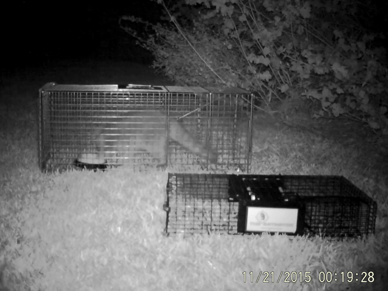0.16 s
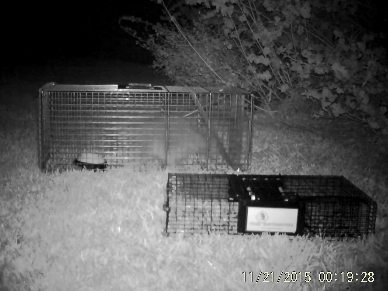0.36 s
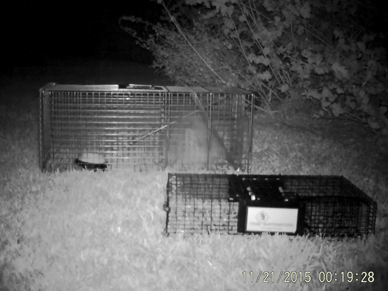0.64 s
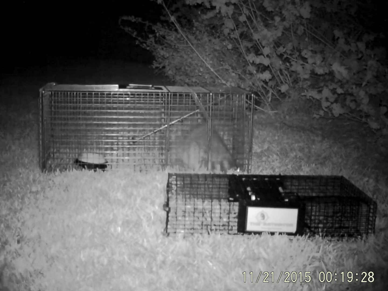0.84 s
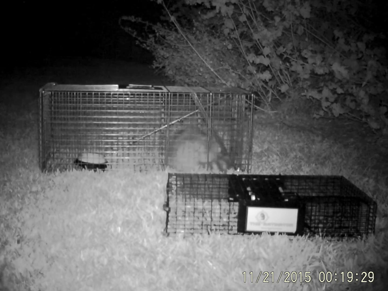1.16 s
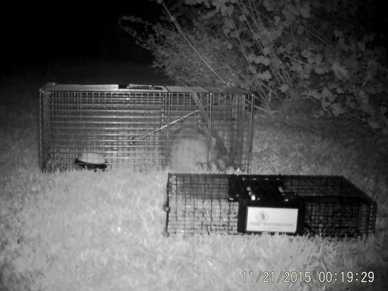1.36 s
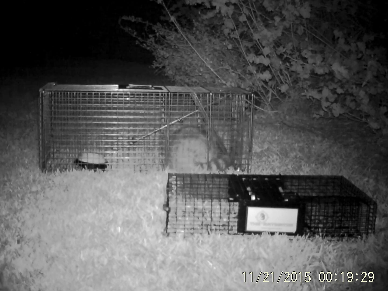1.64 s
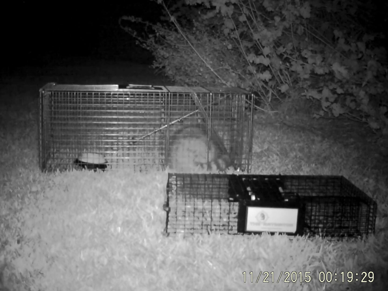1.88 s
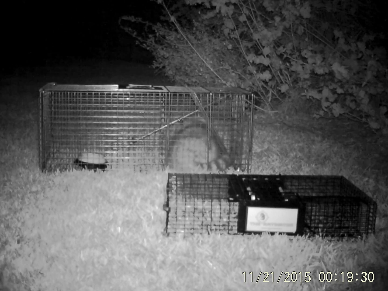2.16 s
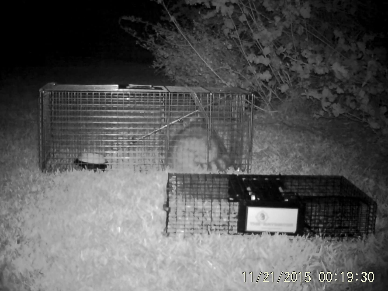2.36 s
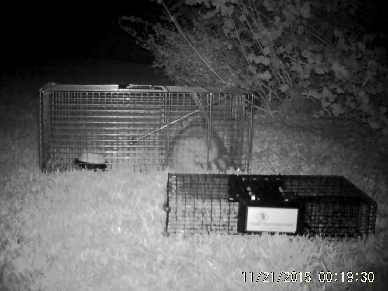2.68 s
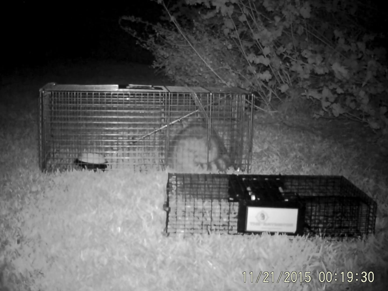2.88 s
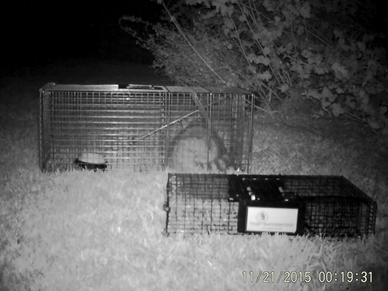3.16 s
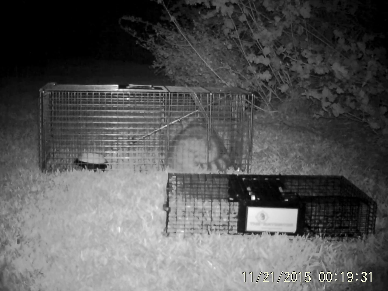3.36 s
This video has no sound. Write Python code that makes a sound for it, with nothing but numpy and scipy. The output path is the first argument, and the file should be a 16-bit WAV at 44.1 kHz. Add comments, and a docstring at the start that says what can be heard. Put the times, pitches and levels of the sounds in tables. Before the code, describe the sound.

Ringing wire mesh rattles with dull thumps, followed by dry metal clacks fading to ticks.

```python
"""Ringing rattles of wire mesh, with dull thumps: a raccoon lunges and turns in a cage trap at night.
Each shake sets the wires chattering against each other; its body thumps the cage floor.
It paws at the door: dry clacks on damped metal, one squeak of a claw along a wire, a few last ticks.
Steady hiss and a faint hum lie underneath."""
import sys
import numpy as np
from scipy import signal
from scipy.fft import rfft, irfft
from scipy.io import wavfile

SR = 44100
rng = np.random.default_rng(int(sys.argv[2]) if len(sys.argv) > 2 else 0)


def to_wav(sig):
    """Store sig (one row per channel, or 1-D mono) as 16-bit WAV at the path in sys.argv[1].

    Samples outside -1..1 are clipped; the rate is SR.
    """
    pcm = np.clip(np.atleast_2d(sig), -1, 1) * 32767
    pcm = np.round(pcm).astype(np.int16)
    wavfile.write(sys.argv[1], SR, pcm.T)  # frames by channels


N = 155232
HZ = np.maximum(np.fft.rfftfreq(N, 1 / SR), 1)
RING_S = np.arange(int(.7 * SR)) / SR
BASS_BELOW_HZ, LOWS_BELOW_HZ, TREBLE_ABOVE_HZ = 780, 2780, 7200

# long-ringing wires: (frequency [Hz], relative level [dB])
WIRE_RINGS = [(807, -2), (1093, -4.5), (1334, -0.5), (1394, 0.5), (1760, -8.5), (2245, -2.5), (3160, -6),
              (3595, -7), (4156, 7), (4320, 3.5), (4460, 8), (4574, 0.5), (5340, -7), (5910, 2.5)]
# dense weaker mesh modes: (frequency [Hz], relative density [dB])
MESH_SPECTRUM = [(250, -19.5), (480, -20), (700, -15.5), (950, -12), (1350, -13.5), (1900, -13),
                 (2300, -9.5), (2700, -18), (3200, -7.5), (3700, -10.5), (4400, 0), (5000, -5.5),
                 (6300, -9), (7200, -15.5), (8800, -22.5), (11300, -16.5), (12700, -24), (14800, -21)]
# mesh shakes: (time [s], level [dB], chatter length [s], lows [dB], treble [dB])
SHAKES = [(0.003, -46, 0.023, 5.5, 2), (0.094, -49.5, 0.0044, 0, 6), (0.142, -47.5, 0.013, -2, 3),
          (0.1712, -39, 0.0051, -2, 3.5), (0.203, -31, 0.011, -3, 5.5), (0.2135, -30, 0.016, 2, 0.5),
          (0.241, -38.5, 0.016, 3.5, 10), (0.286, -40, 0.088, 3, 0), (0.3827, -43.5, 0.0058, 1, -6),
          (0.4086, -35.5, 0.028, 1, 6.5), (0.447, -36.5, 0.043, 2.5, 1), (0.494, -38.5, 0.011, 1.5, 3),
          (0.525, -58, 0.03, 16, 13), (0.605, -54.5, 0.008, 12, 1), (0.6743, -47, 0.0042, 9, 6),
          (0.684, -43, 0.025, 5.5, 5), (0.735, -41.5, 0.029, -7, 3), (0.797, -49.5, 0.031, 8.5, 5.5),
          (0.872, -45.5, 0.02, 6, 1)]


def mesh_rattles(mesh_t60_s=0.53, wire_t60_s=0.32, wires_db=-6, clash_db=3.5, clash_t60_s=0.032):
    """Shaken wires strike each other: each contact crashes briefly, then mesh and wires ring."""
    out = np.zeros(N)
    wire_hz, wire_db = np.transpose(WIRE_RINGS)
    wires = modes(wire_hz, wire_t60_s)
    mesh_gain = rms_one(at_hz(MESH_SPECTRUM, HZ))
    mesh_decay = np.hypot(decay(mesh_t60_s), from_db(clash_db) * decay(clash_t60_s))
    for s, db, length_s, lows_db, treble_db in SHAKES:
        tilt_db = lows_db * lows(HZ, LOWS_BELOW_HZ) + treble_db * (1 - lows(HZ, TREBLE_ABOVE_HZ))
        mesh = noise(mesh_gain * from_db(tilt_db))[:len(RING_S)] * mesh_decay
        strength = from_db(wire_db + wires_db + lows_db * lows(wire_hz, LOWS_BELOW_HZ))
        strength /= np.linalg.norm(from_db(wire_db))
        ring = mesh / np.sqrt(2) + (strength * rng.choice([-1, 1], len(wire_hz))) @ wires
        add(out, s, from_db(db) * signal.fftconvolve(chatter(length_s), ring))
    return out


# damped door modes: (frequency [Hz], relative level [dB], T60 [s])
DOOR_RINGS = [(650, -2, 0.012), (1100, -6.5, 0.0094), (1770, -4.5, 0.013), (2380, -0.5, 0.013),
              (3090, -5, .017), (3900, -2, 0.012), (4620, 1, 0.011), (5380, -0.5, .019), (5800, 1, 0.01),
              (6430, 4, 0.0063)]
# claw and door knocks: (time [s], level [dB], chatter length [s], lows [dB], bass [dB])
KNOCKS = [(0.39, -30, .006, 3, 0), (0.4994, -37, .004, 16, -5), (0.785, -29.5, .003, -6, 16),
          (0.8268, -33, .007, -13, 14), (0.869, -44, .0025, -12, -6), (0.893, -45, .007, -14, -1),
          (0.937, -29, .004, -3.5, -1), (0.9565, -37.5, .004, 8, -5), (0.968, -35, .02, 2.5, 6),
          (1.0047, -40.5, .015, 12, -14), (1.072, -42, .0025, 7, -11), (1.0766, -42, .004, 5, 3),
          (1.1185, -36, .0035, 10, 2), (1.151, -50, .012, 14, 0), (1.172, -42.5, .018, 1, -4),
          (1.2224, -47, .003, -7, -4), (1.4092, -42.5, .0025, -15, 0)]


def door_clacks(spread_db=1.5, crack_db=-12.5, tail_db=-16.5, tail_t60_s=0.17, top_hz=6300):
    """Each knock is a few quick contacts on damped metal, with a noisy crack and a faint tail."""
    out = np.zeros(N)
    hz, mode_db, t60_s = np.transpose(DOOR_RINGS)
    door = modes(hz, t60_s)
    band = signal.butter(4, [hz.min(), top_hz], "band", fs=SR, output="sos")
    grit_decay = from_db(crack_db) * decay(t60_s.min()) + from_db(tail_db) * decay(tail_t60_s)
    for s, db, length_s, lows_db, bass_db in KNOCKS:
        tilt_db = lows_db * lows(hz, LOWS_BELOW_HZ) + bass_db * lows(hz, BASS_BELOW_HZ)
        strength = from_db(mode_db + tilt_db + spread_db * rng.standard_normal(len(hz)))
        ring = (strength * rng.choice([-1, 1], len(hz))) @ door / np.linalg.norm(from_db(mode_db))
        grit = rms_one(signal.sosfilt(band, rng.standard_normal(len(RING_S))))
        knock = signal.fftconvolve(chatter(length_s), ring + grit * grit_decay)
        knock *= np.sqrt(0.0017 * SR) / np.linalg.norm(knock)   # energy of 1.7 ms at rms 1
        add(out, s, from_db(db) * knock)
    return out


# claw drag: (time [s], level [dB], length [s], pitch [Hz])
CLAW_DRAGS = [(0.962, -43, .027, 1750)]


def claw_squeak():
    """A claw drags along a wire: a short, rough tone."""
    return swells(CLAW_DRAGS, width_hz=190)


# body landings: (time [s], level [dB], length [s], pitch [Hz])
LANDINGS = [(0.388, -44, 0.027, 185), (0.412, -48.5, 0.048, 158), (0.462, -57.5, 0.067, 119),
            (0.764, -47.5, 0.025, 113), (0.788, -54, 0.022, 256), (0.802, -49.5, 0.04, 138)]


def floor_thumps():
    """The body lands on the cage floor: low, dull pulses."""
    return swells(LANDINGS, width_hz=110)


# hiss: (frequency [Hz], density [dB re 1/Hz])
HISS_SPECTRUM = [(20, -82), (45, -87.5), (80, -82), (130, -84.5), (250, -90), (500, -92.5), (850, -94),
                 (2000, -98), (5000, -102.1), (10000, -103.1), (15500, -103.1)]
# hum: (frequency [Hz], level [dB])
HUM_TONES = [(61, -68), (113, -70)]


def background():
    """Even hiss and a faint hum of narrow, wavering noise bands."""
    hiss = noise(at_hz(HISS_SPECTRUM, HZ) * np.sqrt(SR / 2))
    hum = sum(from_db(db) * resonant_noise(hz, width_hz=5) for hz, db in HUM_TONES)
    return hiss + hum


def chatter(length_s, contacts_per_s=950, spread_db=4, first_db=6):
    """A first contact and an uneven run of mostly smaller ones; energy 1."""
    times_s = np.cumsum(rng.exponential(1, 200)) / contacts_per_s
    sizes = from_db(spread_db * rng.standard_normal(200)) * rng.choice([-1, 1], 200)
    inside = times_s < length_s
    clicks = np.zeros(int(length_s * SR) + 2)
    clicks[(times_s[inside] * SR).astype(int)] = sizes[inside]
    clicks[0] = from_db(first_db)
    return clicks / np.linalg.norm(clicks)


def swells(rows, width_hz):
    """Short unsteady tones that swell and fade."""
    out = np.zeros(N)
    for s, db, length_s, hz in rows:
        envelope = np.sin(np.linspace(0, 1, int(length_s * SR)) ** .75 * np.pi)
        tone = resonant_noise(hz, width_hz)[:len(envelope)]
        add(out, s, from_db(db) * rms_one(envelope * tone))
    return out


def modes(hz, t60_s):
    """Decaying sines, one row per mode."""
    return np.sin(2 * np.pi * hz[:, None] * RING_S) * decay(t60_s)


def decay(t60_s):
    """Exponential decay, one row per T60."""
    return np.exp(-np.log(1000) * RING_S / np.asarray(t60_s)[..., None])


def noise(gain):
    """Noise with this gain at each frequency."""
    return irfft(rfft(rng.standard_normal(N)) * gain, N)


def resonant_noise(hz, width_hz):
    """Noise in one steep resonance, rms 1."""
    return rms_one(noise(1 / (1 + ((HZ - hz) / (width_hz / 2)) ** 2)))


def lows(hz, corner_hz):
    """Shelf weight: 1 well below the corner, 0 well above."""
    return 1 / (1 + (hz / corner_hz) ** 6)


def at_hz(spectrum, hz):
    """Gain of a spectrum table at these frequencies."""
    points_hz, db = np.transpose(spectrum)
    return from_db(np.interp(np.log(hz), np.log(points_hz), db))


def from_db(db):
    return 10 ** (np.asarray(db) / 20)


def rms_one(x):
    return x / np.sqrt(np.mean(x ** 2) + 1e-20)


def add(out, s, x):
    """Mix x in at time s."""
    start = int(s * SR)
    out[start:start + len(x)] += x[:N - start]


def scene():
    """The cage on a lawn in open air, the same in both channels."""
    mono = background() + mesh_rattles() + door_clacks() + claw_squeak() + floor_thumps()
    return np.array([mono, mono])


def record(dry):
    """Steep treble cut and a small constant offset."""
    cutoff_hz, offset = 15560, .0046
    lowpass = signal.firwin(301, cutoff_hz, window=("kaiser", 8), fs=SR)
    return signal.fftconvolve(dry, lowpass[None], "same", axes=1) + offset


dry = scene()
out = record(dry)
to_wav(out)
```